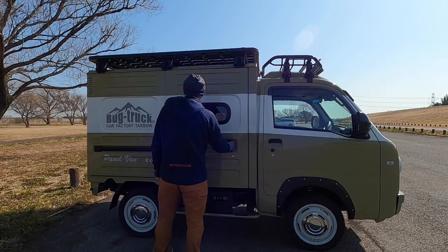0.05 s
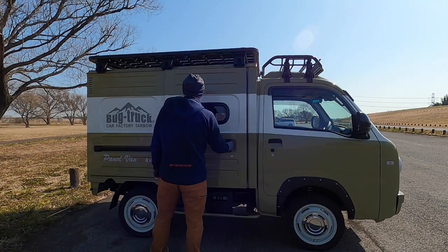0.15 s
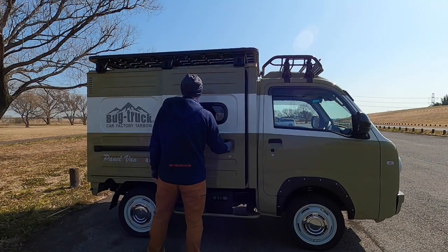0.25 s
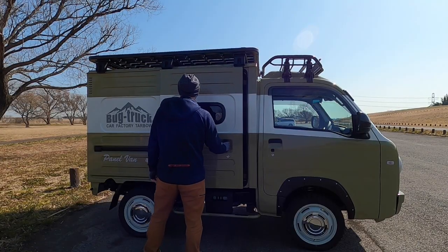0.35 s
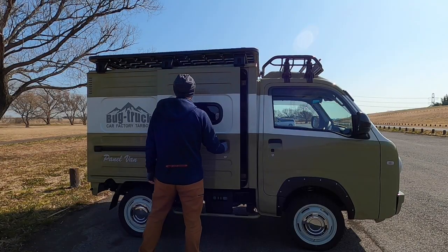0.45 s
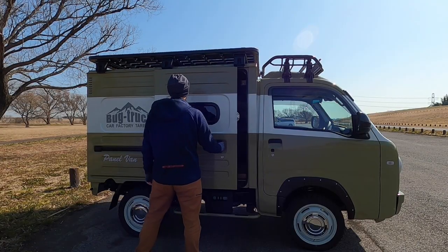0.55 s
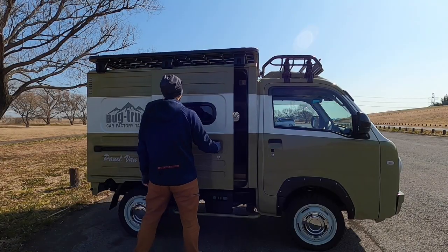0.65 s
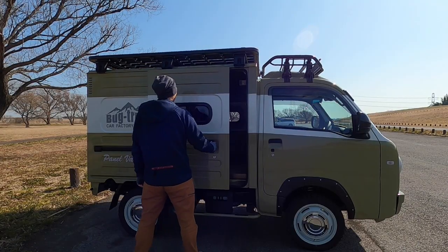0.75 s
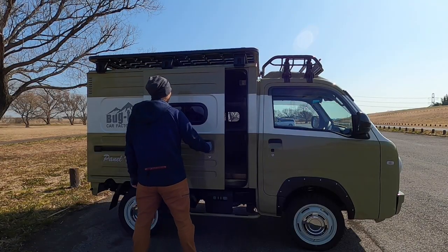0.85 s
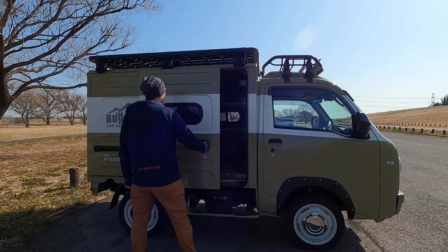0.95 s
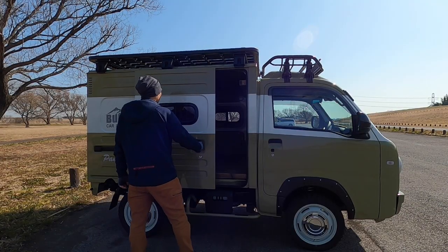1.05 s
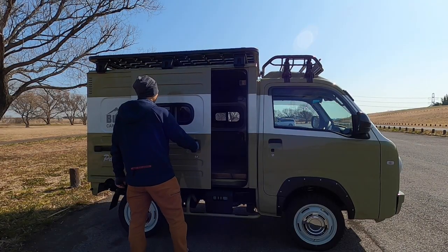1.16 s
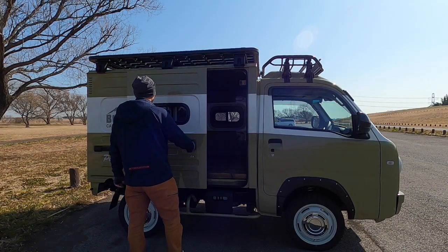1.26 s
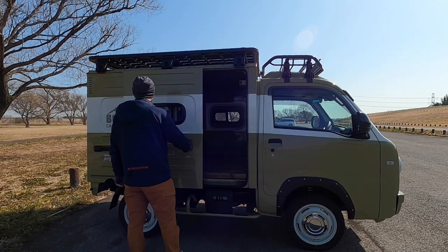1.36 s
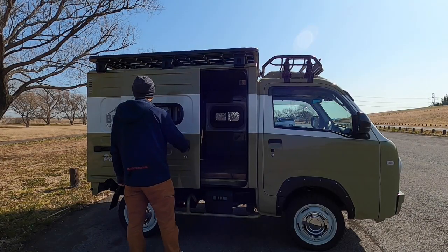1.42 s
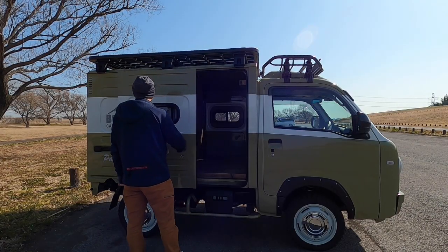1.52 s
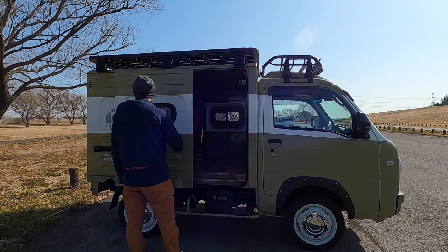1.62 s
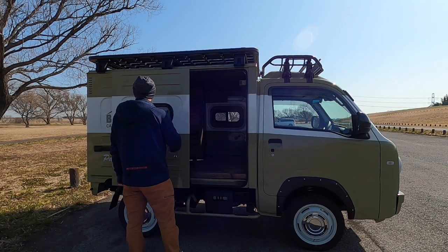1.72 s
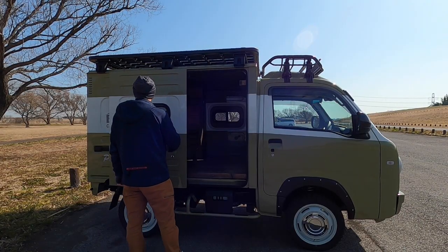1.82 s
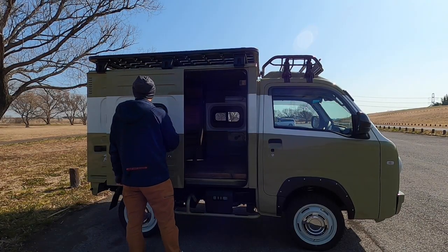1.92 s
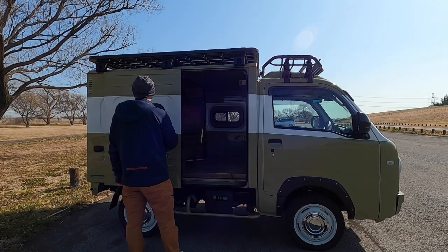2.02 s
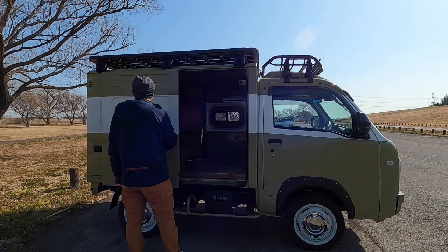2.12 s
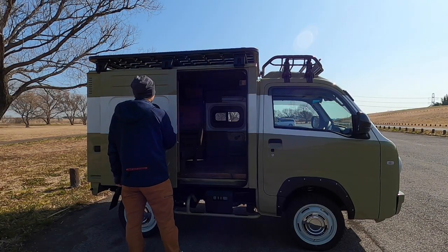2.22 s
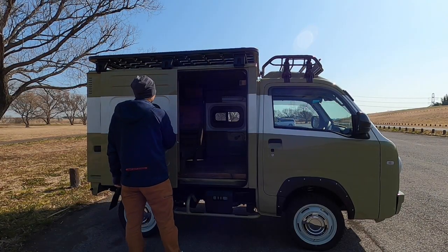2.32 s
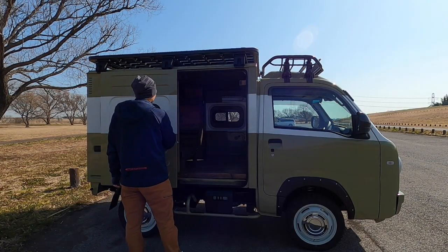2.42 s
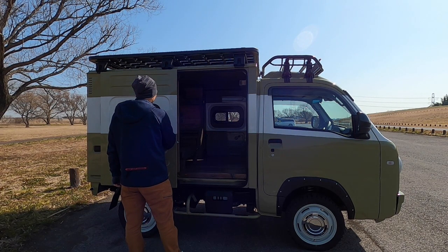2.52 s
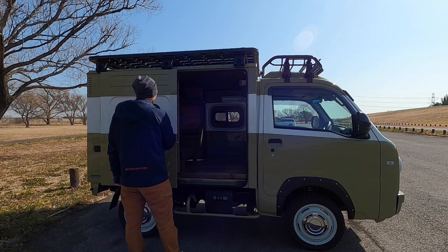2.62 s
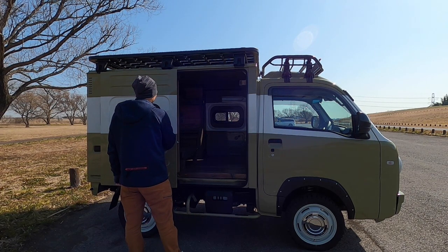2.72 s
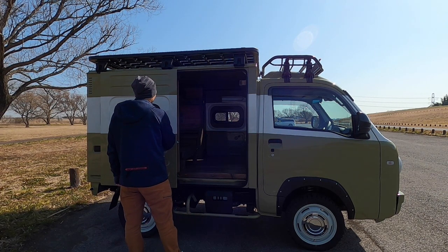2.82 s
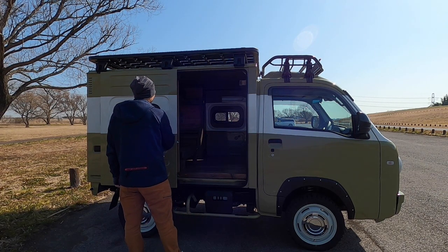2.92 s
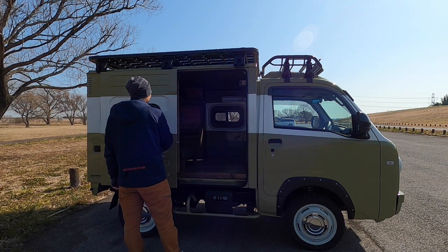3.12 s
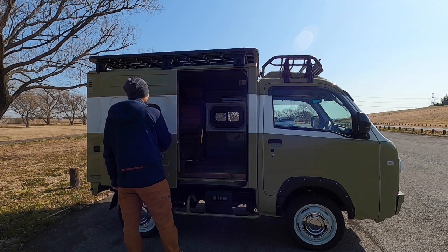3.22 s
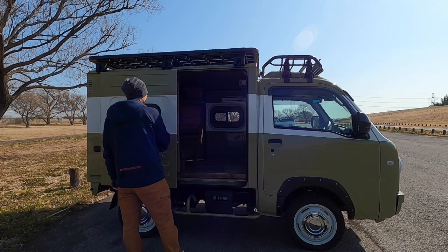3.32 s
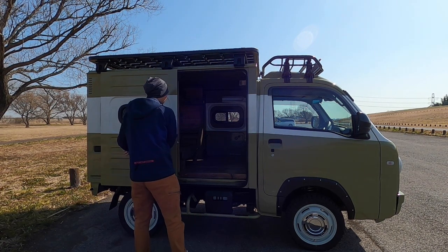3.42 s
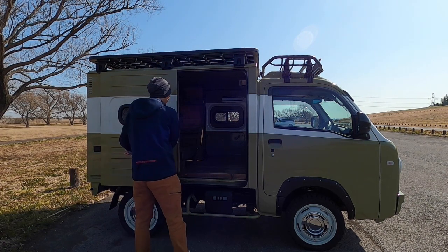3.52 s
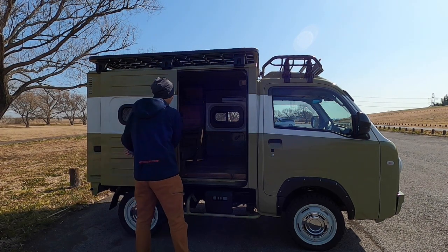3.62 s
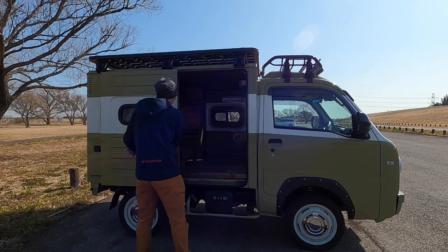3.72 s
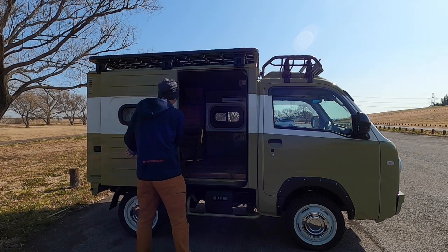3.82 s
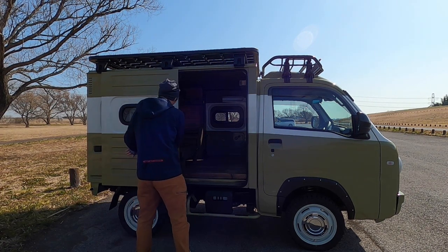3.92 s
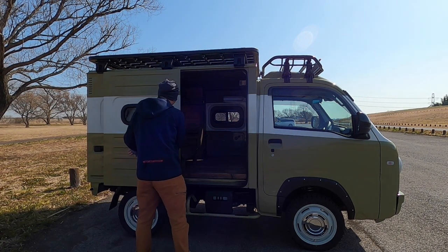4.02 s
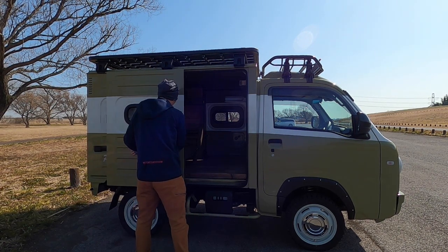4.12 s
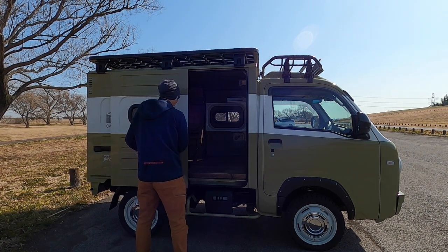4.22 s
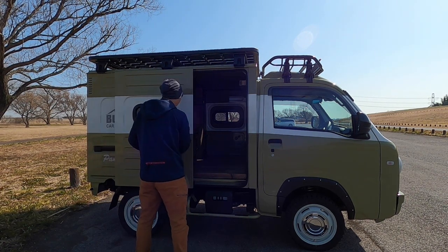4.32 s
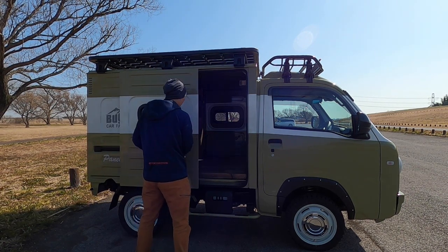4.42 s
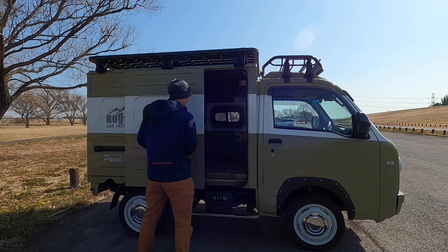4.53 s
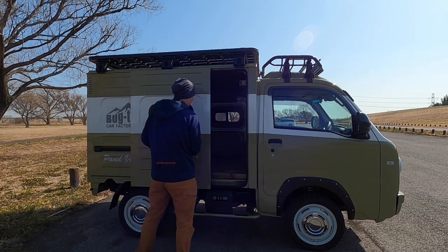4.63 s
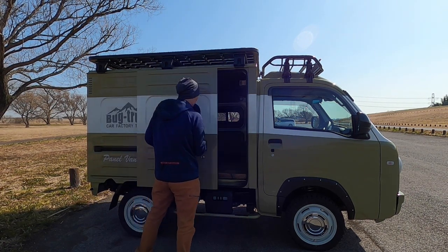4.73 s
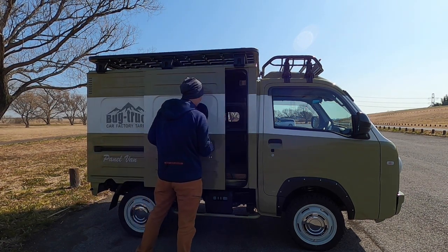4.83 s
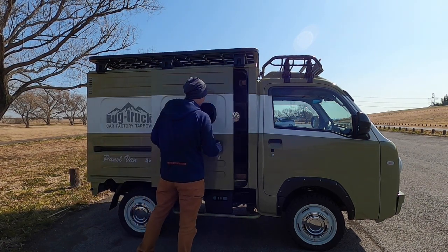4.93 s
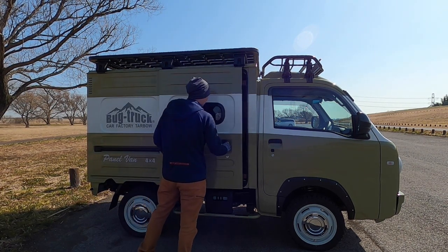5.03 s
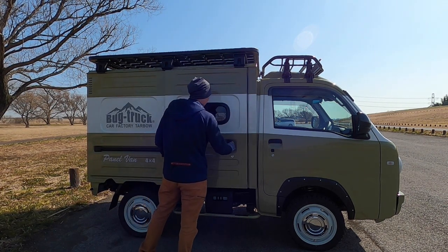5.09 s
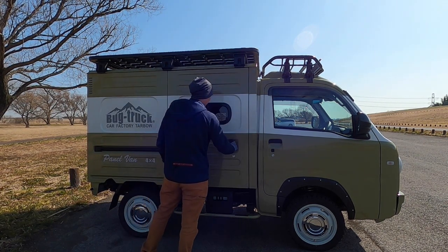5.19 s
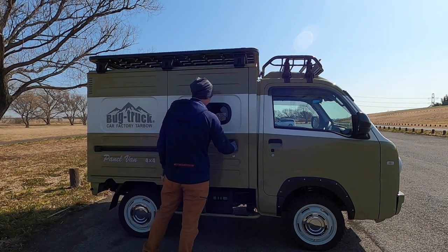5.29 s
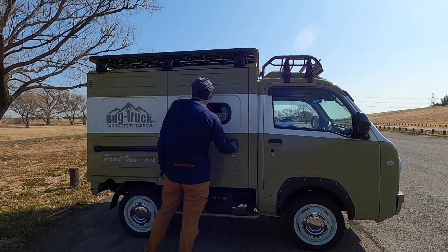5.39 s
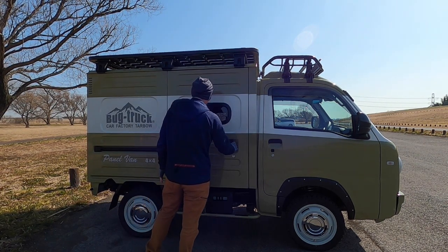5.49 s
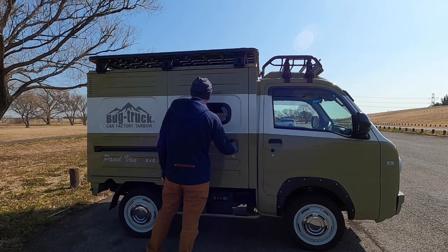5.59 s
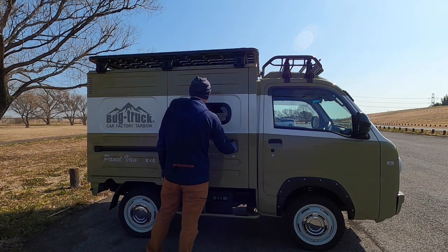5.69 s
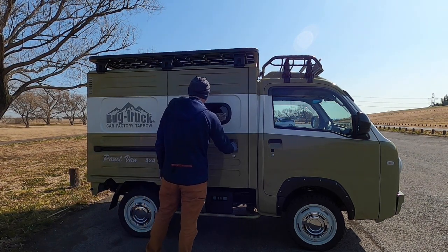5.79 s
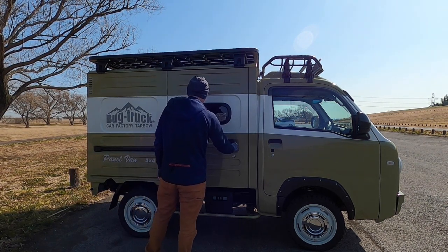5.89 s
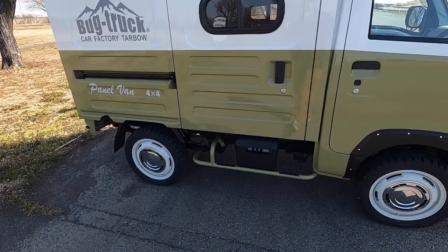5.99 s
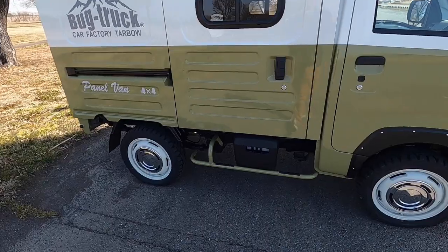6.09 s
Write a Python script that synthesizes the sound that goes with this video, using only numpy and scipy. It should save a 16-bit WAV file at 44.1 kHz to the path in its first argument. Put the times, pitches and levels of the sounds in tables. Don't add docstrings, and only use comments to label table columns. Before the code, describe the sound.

Outdoors, a van's side door unlatches with a hollow clunk, rolls back along a gritty rail to a stop, then rolls shut and slams heavily.

```python
import sys
import numpy as np
from scipy import signal
from scipy.fft import rfft, irfft, next_fast_len
from scipy.io import wavfile
from scipy.ndimage import uniform_filter1d

SR = 44100
rng = np.random.default_rng(int(sys.argv[2]) if len(sys.argv) > 2 else 0)


def waveform_to_disk(signal):
    frames = np.transpose(np.atleast_2d(signal))
    scaled = np.clip(frames, -1, 1) * 32767
    samples = np.round(scaled).astype(np.int16)
    wavfile.write(sys.argv[1], SR, samples)


def ratio_of_db(decibels):
    return 10 ** (np.asarray(decibels, float) / 20)


N = 271215


def evened(x):
    return x / np.sqrt(np.mean(x ** 2) + 1e-20)


def read(points, hz):
    f, value = np.transpose(points)
    return np.interp(np.log(hz + 1), np.log(f + 1), value)


def add(mix, s, sound):
    part = mix[round(s * SR):][:len(sound)]
    part += sound[:len(part)]


def swell(t, s, db, length):
    return db * np.exp(-((t - s) / length) ** 2)


def resonate(x, hz, width):
    r = np.exp(-np.pi * width / SR)
    pole = r * np.exp(2j * np.pi * hz / SR)
    return 2 * signal.lfilter([1 - r], [1, -pole], x).real


def bands(spectrum):
    hz = np.abs(np.fft.fftfreq(8192, 1 / SR)) + 1
    low = 1 / (1 + (hz / 700) ** 10)
    high = 1 / (1 + (3000 / hz) ** 14)
    gain = ratio_of_db(read(spectrum, hz)) * np.sqrt(np.abs([low, 1 - low - high, high]))
    log_gain = np.log(np.maximum(gain, 1e-6 * gain.max()))
    taps = np.fft.ifft(np.exp(signal.hilbert(log_gain).conj())).real[:, :2048]
    return taps / np.linalg.norm(taps, axis=1, keepdims=True)


# frequency_hz [Hz], density_db [dB per Hz]
FIELD_SPECTRA = [
    [(12, -37), (20, -6), (79, -3), (108, -7), (127, -26), (165, -14), (256, -31), (544, -48.5), (892, -50),
     (990, -43), (1460, -44), (3830, -66.5), (10000, -85.5), (13000, -117), (22000, -120)],
    [(12, -27), (20, -13), (54, 5.5), (86, -5.5), (124, -4.5), (192, -23.5), (237, -22.5), (284, -25),
     (559, -42.5), (670, -52), (1160, -39), (3280, -61), (10000, -80), (13000, -116), (22000, -120)],
    [(12, -29), (20, 2), (48, -5), (64, -8.5), (117, -9.5), (197, -17), (237, -20), (350, -34), (604, -41),
     (706, -53.5), (6790, -70.5), (10000, -77), (13000, -113), (22000, -120)],
]
FIELD_DB = [-33, -31, -31]
# centre_s [s], swell_db [dB], length_s [s]
BASS_SWELLS = [
    (.27, 7, .12),
    (1.2, 2, 0.13),
    (2.4, 7.5, 0.18),
    (4.598, 3.5, 0.53),
    (5.1, 8, .1),
    (5.3, 13.5, 0.12),
    (5.64, -7, 0.18),
    (6.15, 1.5, 0.27),
]
CALM_DB = -1
# start_s [s], level_db [dB], slope_db_per_s [dB/s]
ROAD = [
    (0, 1.5, 0.05),
    (3.4, 6, -3),
    (5.94, 6.5, 3.5),
]
# frequency_hz [Hz], likeness [0-1]
COHERENCE = [(60, 0.98), (170, 1), (460, 0.87), (1260, 0.67), (3470, 0.17), (9580, 0.25)]


def field(patchy_db=1.5, bass_hz=130, road_hz=1450):
    frames, hz = N // 512 + 5, np.fft.rfftfreq(2048, 1 / SR)
    t = np.arange(frames) * 512 / SR
    a, b, c, d, patches = rng.standard_normal((frames, 1025, 5)).T
    patches = uniform_filter1d(patches, size=20, axis=0)
    patches = evened(uniform_filter1d(patches, size=6, axis=1))
    colours = [ratio_of_db(db) * evened(ratio_of_db(read(f, hz))) for f, db in zip(FIELD_SPECTRA, FIELD_DB)]
    view = np.searchsorted([row[0] for row in JOINS], t)
    bass_db = CALM_DB + sum(swell(t, *row) for row in BASS_SWELLS)
    level_db = bass_db / (1 + (hz[:, None] / bass_hz) ** 4)
    start_s, road_db, slope_db = np.array(ROAD)[view].T
    roar_shape = np.exp(-np.log((hz[:, None] + 1) / road_hz) ** 2 / .6)
    level_db += (road_db + slope_db * (t - start_s)) * roar_shape
    same = np.clip(read(COHERENCE, hz), -1, 1)[:, None]
    left = a + 1j * b
    right = same * left + np.sqrt(1 - same ** 2) * (c + 1j * d)
    z = np.array([left, right])
    z *= np.array(colours)[view].T * ratio_of_db(level_db + patchy_db * patches) / 26
    return signal.istft(z, nperseg=2048, noverlap=1536)[1][:, :N]


def hiss(db=-97.5):
    return ratio_of_db(db) * rng.standard_normal((2, N))


# start_s [s], level_db [dB], pitch_hz [Hz], t60_s [s], sign [push +1, pull -1]
BOOMS = [(.114, -10, 230, .12, -1), (.124, -9, 42, .3, -1), (.1265, -7, 360, .05, 1),
         (.185, -16, 30.5, .7, -1), (.372, -25, 35, .4, 1), (.376, -22, 195, .3, 1),
         (2.290, -19, 70, .15, 1), (2.355, -21, 45, .3, 1), (2.425, -20, 360, .08, 1),
         (2.447, -14, 45, .15, 1), (2.498, -20, 35, .4, 1), (5.076, -9, 230, .12, -1),
         (5.082, -9, 50, .3, -1), (5.115, -15, 200, .12, 1), (5.165, -16, 65, .25, 1),
         (5.243, -8, 255, .1, 1), (5.242, -14, 445, .14, 1), (5.275, -17, 440, .12, 1),
         (5.284, -16, 110, .2, 1), (5.277, -10, 280, .12, 1), (5.31, -16, 185, .2, 1),
         (5.345, -20, 200, .3, 1), (5.262, -13, 116, .3, 1), (5.2335, -3, 54, .32, 1),
         (5.264, -1, 29.5, .65, -1)]
# start_s [s], level_db [dB], pitch_hz [Hz], t60_s [s]
SEAMS = [(.529, -28.5, 189, 0.14), (.75, -29, 191, .15), (1.073, -29.5, 188, 0.13), (1.282, -26, 170, 0.12),
         (1.38, -23, 183, .1), (1.699, -30, 220, 0.13), (4.194, -26, 213, 0.092), (4.24, -23, 245, .1),
         (4.307, -28, 250, 0.13), (4.345, -20, 111, .1), (4.454, -25.5, 185, .1), (4.489, -24, 196, 0.11),
         (4.545, -21.5, 150, 0.095), (4.6, -21, 130, .1), (4.729, -25, 290, 0.103), (4.836, -24, 312, 0.11),
         (5.028, -21, 340, .08)]


def booms(rise_turns=0.24):
    t, out = np.arange(SR) / SR, np.zeros(N)
    for s, db, hz, t60, sign in BOOMS + [(*row, 1) for row in SEAMS]:
        onset = 1 - np.exp(-t * hz / rise_turns)
        add(out, s, sign * ratio_of_db(db - 60 * t / t60) * onset * np.sin(2 * np.pi * hz * t))
    return out


# start_s [s], level_db [dB], thud_db [dB re level], snap_db [dB re level]
LATCH = [
    (0.1155, -26.5, 13, -14),
    (0.127, -24.5, 12, -25),
    (0.147, -29.5, 2, -26),
    (0.177, -30, 1, -14),
    (0.214, -28.5, 6.5, -20),
    (0.241, -41, 12.5, -17),
]
HANDLE = [
    (0.41, -36, -4.5, -20),
    (0.37, -19.5, -18, -24),
    (0.367, -20, 4, 0.5),
]
STEPS = [(0.676, -49.5, 20, 7.5), (0.754, -36, 9, -16), (0.808, -41, 6, 0.5), (1.158, -27, -27, -20),
         (1.297, -46.5, 27.5, -10), (1.401, -23.5, 2.5, -12), (2.727, -46, -10, -23), (3.443, -53, -4, -8),
         (3.549, -49, 14, -12), (3.98, -52, 6, -12), (4.065, -50, 0, -2), (4.146, -38.5, 2, -7),
         (4.357, -31.5, 9, -5.5), (4.442, -31.5, -20, -3), (4.522, -38.5, 8, 8), (4.681, -39, -5, 6),
         (4.719, -23.5, -8.5, -11), (4.73, -20, -14, -51)]
STOP = [
    (2.271, -25.5, -22, -6.5),
    (2.319, -28.5, 3, -2.5),
    (2.343, -33.5, 15, -8.5),
    (2.374, -27, 15, -30),
    (2.391, -15.5, 3.5, -21.5),
    (2.415, -29, 6.5, -8.5),
    (2.471, -35.5, 14, -19),
    (2.528, -51, 13, -12),
    (2.58, -55.5, 21, -1.5),
]
SLAM = [(5.058, -36.5, 9.5, 4.5), (5.069, -23.5, 9, -11), (5.112, -18, 0.5, -3.5), (5.232, -8.5, 2, -15.5),
        (5.24, -15, 4.5, -9.5), (5.251, -10, 3.5, -6.5), (5.276, -21, 2.5, -9.5), (5.29, -44, -5.5, 4),
        (5.334, -32.5, 11.5, -7.5), (5.361, -37, -8, -12), (5.371, -33.5, -9, -10.5),
        (5.46, -50, 10.5, -6.5), (5.49, -50.5, 7.5, -15)]
# blows [table], t60_s [s], rise_ms [ms]
KINDS = [(LATCH, 0.24, 5.5), (HANDLE, 0.095, 2.8), (STEPS, 0.1, 3.5), (STOP, 0.17, 3.3), (SLAM, 0.2, 3)]
# frequency_hz [Hz], density_db [dB per Hz]
STRUCK = [(76, -19), (130, 12.5), (440, -4), (893, -23.5), (1290, -18.5), (2060, -23), (3130, -26.5),
          (3830, -28.5), (7500, -36), (10000, -54.5), (13000, -91.5), (22000, -120)]
# pitch_hz [Hz], level_db [dB], t60_s [s]
PANEL = [(238.5, 1, 0.56), (318, -4.5, 0.29), (389.7, 0.5, 0.29), (446.5, -4, 0.077), (501, -24, 0.51),
         (593, -7.5, 0.34), (690, -30, 0.38)]


def knocks(rise=(2.5, 1.1, .9), lasting=(1.6, 1.0, .8), crack=0.17, tail_db=-6, panel_db=-8,
           peak_db=-3, air_db=-38, blow_db=-6):
    t, drive = np.arange(SR // 3) / SR, np.zeros((3, N))
    for rows, t60, rise_ms in KINDS:
        for s, db, thud_db, snap_db in rows:
            rattle = rng.standard_normal(len(t))
            for k, rel_db in enumerate((thud_db, 0, snap_db)):
                fall_db = -60 * t / max(t60 * lasting[k], .01)
                onset = (1 - np.exp(-1500 * t / max(rise_ms * rise[k], .1))) ** 2
                decay = ratio_of_db(fall_db / crack) + ratio_of_db(fall_db + tail_db)
                add(drive[k], s - .001, ratio_of_db(db + rel_db + peak_db) * onset * decay * rattle)
    thud, mid, snap = signal.fftconvolve(drive, bands(STRUCK), axes=1)[:, :N]
    panel = sum(ratio_of_db(db) * resonate(thud, hz, 3.6 / t60) for hz, db, t60 in PANEL)
    airy = signal.butter(4, [10000, 15000], "band", fs=SR, output="sos")
    air = signal.sosfilt(airy, drive[2] + ratio_of_db(blow_db) * drive[1])
    return thud + mid + snap + 4 * ratio_of_db(panel_db) * panel + ratio_of_db(air_db) * air


# start_s [s], level_db [dB], pitch_hz [Hz], t60_s [s]
LOCK_RINGS = [(.119, -23, 1180, .1), (.122, -25, 840, 0.076), (.124, -18, 442, 0.066),
              (.150, -31.5, 1790, 0.11), (.180, -54, 7450, 0.067), (.215, -27.5, 1630, 0.058),
              (.178, -37.5, 2650, 0.091), (.186, -34, 1750, .07), (.186, -41.5, 3420, 0.063),
              (.222, -62, 5600, .6), (.25, -39.5, 1350, 0.23), (.135, -30, 1500, 0.087),
              (.370, -16, 1500, 0.034), (.371, -15, 3220, 0.021), (.370, -28, 2430, 0.074),
              (.378, -31, 810, 0.14), (.374, -24.5, 561, .08), (1.1, -44, 1600, 0.069),
              (1.298, -47, 2900, 0.095), (5.070, -23, 1810, .06), (5.085, -27.5, 1310, 0.086),
              (5.07, -22, 450, .08), (5.115, -22, 630, .1), (5.13, -25, 760, .12), (5.112, -26.5, 930, .06),
              (5.26, -23, 620, .25), (5.275, -21, 438, .15), (5.32, -29, 450, .12), (.215, -32, 2100, .06),
              (.225, -36.5, 1100, .15), (1.398, -33, 640, .06), (5.240, -14, 1566, 0.086),
              (5.243, -22.5, 769, 0.2), (5.251, -24.5, 1170, 0.28), (5.24, -13, 440, 0.19),
              (5.272, -30, 2203, 0.053), (5.365, -40.5, 1520, 0.11)]
STOP_RINGS = [(2.322, -28.5, 1554, 0.14), (2.372, -28.5, 1094, 0.091), (2.372, -26, 720, 0.083),
              (2.393, -26.5, 2390, 0.045), (2.396, -24, 767, 0.12), (2.38, -28, 265, 0.25),
              (2.4, -25.5, 364, 0.15), (2.415, -37, 3640, 0.13), (2.418, -32.5, 1930, 0.078),
              (2.423, -48.5, 4600, 0.15), (2.43, -36, 925, 0.23), (2.472, -44.5, 1870, 0.17),
              (2.272, -34, 3000, .06), (2.275, -37.5, 1150, 0.088), (2.32, -35.5, 2900, 0.064),
              (2.475, -47.5, 3700, 0.089), (2.45, -35, 450, .12), (5.57, -55, 380, .6),
              (2.335, -41, 1840, 0.28), (2.729, -55, 1540, 0.133)]
PUFFS = [
    (.808, -48, 5540, 0.085),
    (5.059, -39, 5540, 0.05),
    (5.075, -40.5, 5900, 0.19),
    (5.112, -45.5, 7500, .1),
    (.676, -49, 5600, .05),
    (5.238, -46, 9800, .12),
    (5.287, -52, 8300, .06),
    (5.241, -53, 12180, .15),
    (5.288, -59, 11300, 0.11),
    (5.327, -59, 10700, 0.097),
]
# parts [table], least_width_hz [Hz], width_share [fraction of pitch]
PARTS = [(LOCK_RINGS, 160, 0.035), (STOP_RINGS, 110, 0.025), (PUFFS, 100, 0.13)]


def chatter(rise_s=0.0007):
    t, out = np.arange(SR // 2) / SR, np.zeros(N)
    for rows, least_hz, share in PARTS:
        for s, db, hz, t60 in rows:
            width = least_hz + share * hz
            once = resonate(rng.standard_normal(len(t)), hz, width)
            tone = evened(resonate(once, hz, width))
            add(out, s, ratio_of_db(db - 60 * t / t60) * (1 - np.exp(-t / rise_s)) * tone)
    return out


# time_s [s], rail_db [dB, rises with speed], load_db [dB], dryness_db [dB]
ROLLS = [
    [(0.2, -63, -2, 4.5), (0.46, -58.5, 2, -1), (0.54, -56, 2.5, 3.5), (.7, -52, 2.5, 3),
     (.85, -48.5, 0.5, 1), (0.99, -49, -0.5, 3.5), (1.15, -48.5, -0.5, -0.5), (1.33, -49, 0.5, 0.5),
     (1.53, -51, 3, 0), (1.73, -52, 4.5, 2), (1.95, -54, 4.5, -0.5), (2.12, -55.5, 7, 0), (2.38, -54, 3, 0),
     (2.85, -83, -0.5, 2)],
    [(3.9, -72, -23, 0), (4.102, -56, 2.5, -2.5), (4.25, -46, 3, -2.5), (4.41, -45, 3, 1),
     (4.6, -43, 2.5, 0.5), (4.8, -39.5, -2, -0.5), (4.972, -37, -2.5, -0.5), (5.06, -34, -2.5, -1),
     (5.15, -33.5, -2.5, -1.5), (5.222, -35.5, 0, 1), (5.3, -23.5, -4.5, -3)],
]
# frequency_hz [Hz], density_db [dB per Hz]
ROLLING = [(76, -25), (130, 0), (269, 2), (311, -4.5), (347, -4), (527, -11), (610, -12.5), (801, -13),
           (1380, -14.5), (2180, -23), (3130, -31.5), (4760, -42.5), (6370, -40), (10000, -62.5),
           (13000, -82), (22000, -120)]
# [dB, unused]
RAIL = [(1151, 25, 0), (1850, 140, -4), (2900, 250, -11), (3210, 75, -9), (3710, 19, -15), (5480, 98, -20),
        (5930, 72, -21), (6700, 88, -20), (7600, 200, -27), (8600, 220, -33)]
# pitch_hz [Hz], width_hz [Hz], level_db [dB]
DRUM = [(203, 73, -3.5), (318, 45, 0.5), (430, 120, -0.5), (613, 31, 1), (1430, 34, 0.5), (2300, 36, 1)]
# centre_s [s], level_db [dB re grind], pitch_hz [Hz], length_s [s]
SINGS_OPENING = [(0.547, 8, 192, 0.071), (0.548, 9, 5880, .06), (0.582, 9.5, 1450, 0.091),
                 (0.59, 10.5, 1700, .06), (.76, 6.5, 1790, .05), (0.753, 3.5, 191, 0.055),
                 (0.848, 4.5, 1300, .1), (.85, 7.5, 686, .12), (0.848, 6.5, 7600, .08),
                 (0.933, 9.5, 6360, .05), (0.949, 9.5, 2020, .04), (.98, 9.5, 1750, .06),
                 (0.986, 6.5, 430, 0.035), (1.028, 8.5, 8600, .04), (1.05, 7.5, 5470, .08),
                 (1.06, 11, 3240, .07), (1.08, 11.5, 2370, .05), (1.122, 9, 1370, 0.09),
                 (1.15, 11.5, 2810, 0.074), (1.15, 2, 6600, 0.073), (1.25, 8, 3150, 0.055),
                 (1.28, 7.5, 3700, .04), (1.3, 9.5, 184, 0.056), (1.526, 5, 696, 0.029),
                 (1.702, 6, 600, 0.053), (1.695, 10, 404, 0.048), (1.783, 8, 1800, 0.083),
                 (1.883, 5, 355, .12), (1.958, 6.5, 597, 0.035), (2.096, 5, 406, 0.11),
                 (1.9, 10, 2900, 0.15), (1.802, 7, 3310, .1), (1.9, 8.5, 200, 0.076)]
# centre_s [s], level_db [dB re grind], pitch_hz [Hz], length_s [s]
SINGS_SHUTTING = [(4.25, 8, 620, .03), (4.3, 8, 2250, .03), (4.36, 7, 951, 0.069), (4.4, 10, 1800, .06),
                  (4.45, 8, 1150, .05), (4.45, 4.4, 270.4, .15), (4.52, 9.9, 730, .03), (4.6, 8, 1430, .03),
                  (4.62, 9, 1820, .04), (4.63, 8, 1150, .05), (4.75, 7, 450, .06), (4.8, 8, 1364, .08),
                  (4.83, 8, 1120, 0.044), (4.92, 8, 630, .03), (4.93, 9, 1830, .05), (4.95, 9, 1416, .05),
                  (4.98, 8, 1137, .04), (5.19, 13, 480, .03), (4.66, 8, 479, .07), (4.78, 8, 130, .07)]
RUMBLE_DB, FIZZ_DB, FIZZ_PER_LOAD, FIZZ_PER_SPEED = 10.5, -8.5, -0.29, 0.07


def rolling(rows, grit_per_s=3000, grit_db=2.5, bumpy_db=1.7, blur=1.4, ring=1.1, wander_db=3.5):
    s, *columns = np.transpose(rows)
    t = np.arange(s[0], s[-1], 1 / SR)
    rail_db, load_db, dry_db = (np.interp(t, s, c) for c in columns)
    rumble_db = RUMBLE_DB + load_db
    fizz_db = FIZZ_DB + dry_db + FIZZ_PER_LOAD * load_db + FIZZ_PER_SPEED * (rail_db - rail_db.max())

    grain = ratio_of_db(grit_db * np.minimum(rng.exponential(1, len(t)), 5))
    grain *= rng.random(len(t)) < grit_per_s / SR
    grit = evened(grain * rng.choice([-1, 1], len(t))) + 0.96 * rng.standard_normal(len(t))
    grit *= ratio_of_db(bumpy_db * evened(uniform_filter1d(rng.standard_normal(len(t)), size=1500)))

    knots = np.arange(s[0], s[-1] + .1, .08)
    rings = np.zeros(len(t))
    for hz, width, db in [(hz, blur * width, 0) for hz, width, _ in RAIL] + DRUM:
        mode_db = db + wander_db * np.interp(t, knots, rng.standard_normal(len(knots)))
        rings += ratio_of_db(mode_db) * resonate(grit, hz, width)
    for at, db, hz, length in SINGS_OPENING + SINGS_SHUTTING:
        near = slice(*np.searchsorted(t, [at - 3 * length, at + 3 * length]))
        if near.stop > near.start:
            bell = np.exp(-((t[near] - at) / length) ** 2)
            rings[near] += ratio_of_db(db + 2.0) * bell * resonate(grit[near], hz, 25 + .012 * hz)

    parts = signal.fftconvolve((grit + ring * rings)[None], bands(ROLLING), axes=1)[:, :len(t)]
    sound = sum(evened(p) * ratio_of_db(rail_db + db) for p, db in zip(parts, (rumble_db, 0, fizz_db)))
    return s[0], sound * signal.windows.tukey(len(t), .08)


# start_s [s], level_db [dB], sign [direction and share]
JOINS = [
    (3.403, -30.5, 1),
    (5.9433, -26.5, -0.9),
]


def joins(settle_s=.006):
    out = np.zeros(N)
    for s, db, sign in JOINS:
        add(out, s, sign * ratio_of_db(db) * np.exp(-np.arange(SR // 10) / SR / settle_s))
    return out


# pitch_hz [Hz], level_db [dB], swell_s [s], swell_db [dB], swell_length_s [s]
HUM = [
    (121.1, -40, 3.62, 8, 0.15),
    (183, -43, 5.43, 8.5, 0.19),
]


def engine(waver_db=1.0, drift=.012):
    t, out = np.arange(JOINS[0][0], JOINS[1][0], 1 / SR), np.zeros(N)
    for hz, db, *rise in HUM:
        slow = uniform_filter1d(rng.standard_normal((2, len(t))), size=5000, axis=1)
        waver, wander = (evened(v) for v in uniform_filter1d(slow, size=5000, axis=1))
        level = ratio_of_db(db + swell(t, *rise) + waver_db * waver) * signal.windows.tukey(len(t), .02)
        add(out, t[0], level * np.sin(2 * np.pi * np.cumsum(hz * (1 + drift * wander)) / SR))
    return out


# start_s [s], level_db [dB]
SQUEAKS = [
    (5.463, -55),
    (5.659, -58.5),
]
SQUEAK_S = .033
# start_hz [Hz], top_hz [Hz], end_hz [Hz], top_place [0-1], level_db [dB]
STRIPS = [
    (1550, 1800, 1600, .7, 1),
    (1970, 2850, 2250, 0.3, 0),
    (3000, 3700, 3300, 0.8, -9.5),
]


def squeaks(rough=0.05):
    u, out = np.linspace(0, 1, round(SQUEAK_S * SR)), np.zeros(N)
    for s, db in SQUEAKS:
        for start_hz, top_hz, end_hz, place, strip_db in STRIPS:
            away = np.where(u < place, u / place - 1, (u - place) / (1 - place)) ** 2
            hz = top_hz + (np.where(u < place, start_hz, end_hz) - top_hz) * away
            slips = 1 + rough * evened(uniform_filter1d(rng.standard_normal(len(u)), size=40))
            tone = np.sin(2 * np.pi * np.cumsum(hz * slips) / SR)
            add(out, s, ratio_of_db(db + strip_db) * tone * np.sin(np.pi * u) ** 0.5)
    return out


# frequency_hz [Hz], side_db [dB re middle]
SPREAD = [(60, -23.5), (140, -27.5), (330, -26.5), (760, -24.5), (1770, -14.5), (4110, -12.5), (9580, -11)]
# frequency_hz [Hz], left_over_right_db [dB]
LEAN = [(60, 0), (140, 1.0), (330, 1), (760, -1), (1770, 2), (4110, 0.5), (9580, -1)]


def wide(x):
    hz, t, z = signal.stft(x, SR, nperseg=128)
    scramble = np.exp(2j * np.pi * rng.random(z.shape))
    side = z * scramble * 2 * ratio_of_db(read(SPREAD, hz))[:, None]
    lean = ratio_of_db(read(LEAN, hz) / 2)[:, None]
    both = np.array([(z + side) * lean, (z - side) / lean])
    return signal.istft(both, SR, nperseg=128)[1][:, :N]


# frequency_hz [Hz], left_lead_rad [rad]
LEAD = [(30, .2), (120, 0.13), (330, -.05), (1000, -.2), (2670, -0.4), (6500, -0.4), (9700, -.6)]


def ports(x):
    size = next_fast_len(N)
    half = np.exp(.5j * read(LEAD, np.fft.rfftfreq(size, 1 / SR)))
    return irfft(rfft(x, size) * np.array([half, 1 / half]), size)[:, :N]


def scene():
    door = knocks() + chatter() + squeaks()
    for rows in ROLLS:
        add(door, *rolling(rows))
    low = (booms() + engine()) * ratio_of_db(np.array([[.7], [-.7]]))
    return ports(wide(door) + low + field()) + joins() + hiss()


def roll_off(x):
    return signal.sosfilt(signal.butter(12, 15750, fs=SR, output="sos"), x)


def record(dry, knee_db=-19, squeeze=0.24, recover_db=5.5):
    power_db = 10 * np.log10(abs(uniform_filter1d((dry ** 2).mean(0), size=2000)) + 1e-12)
    fall = np.arange(N) * recover_db / SR
    held_db = np.maximum.accumulate(power_db + fall) - fall
    over_db = np.maximum(held_db - knee_db, 0)
    ducked = dry / ratio_of_db(squeeze * uniform_filter1d(over_db, size=2000))
    ducked = ducked * np.minimum((N - np.arange(N)) / 900, 1)
    mix = np.tanh(ducked / 1.6) * 1.6
    return roll_off(mix)


dry = scene()
out = record(dry)
waveform_to_disk(out)
```